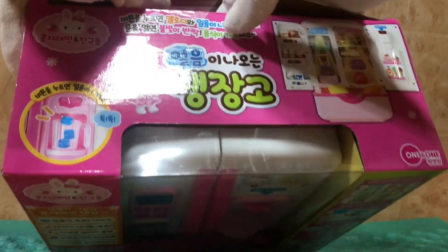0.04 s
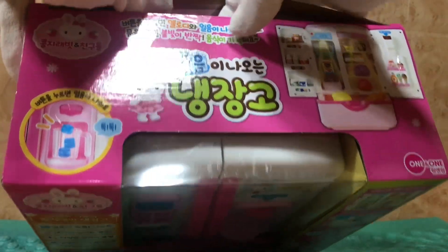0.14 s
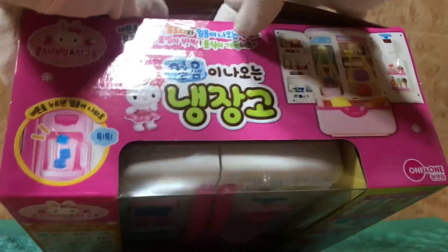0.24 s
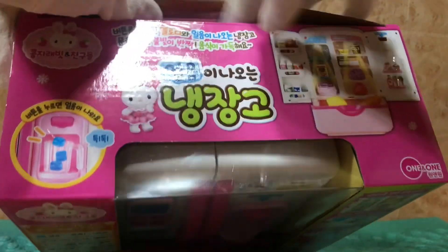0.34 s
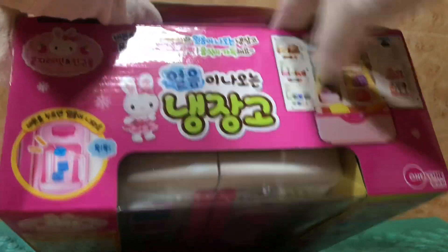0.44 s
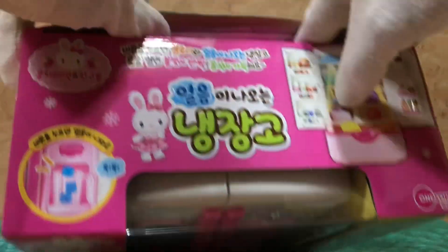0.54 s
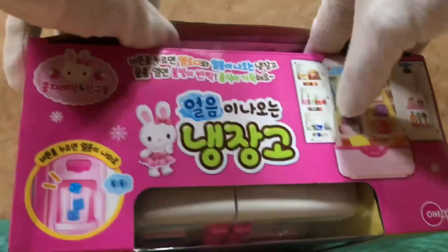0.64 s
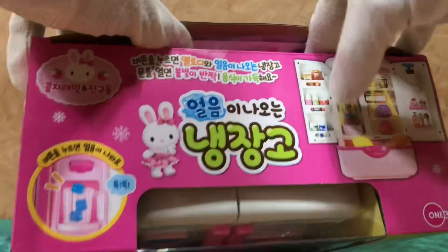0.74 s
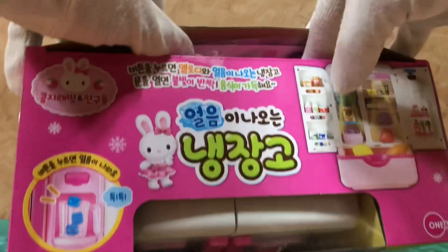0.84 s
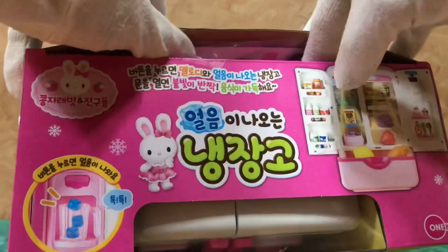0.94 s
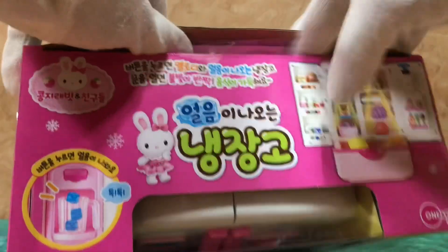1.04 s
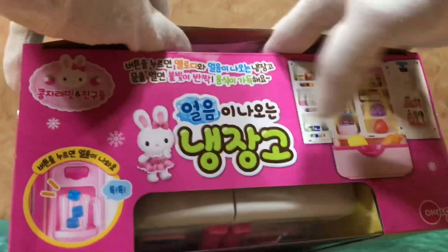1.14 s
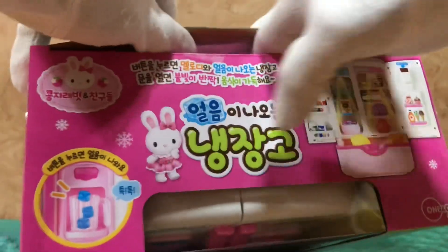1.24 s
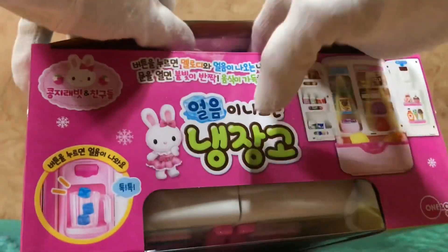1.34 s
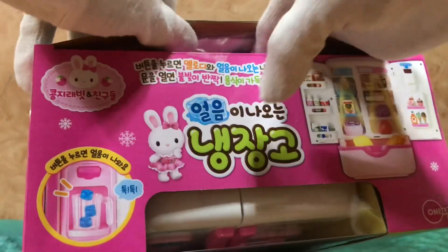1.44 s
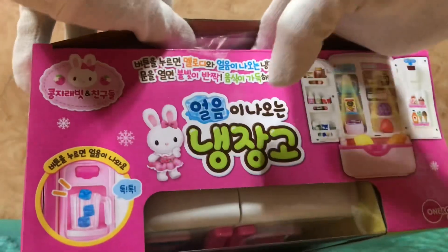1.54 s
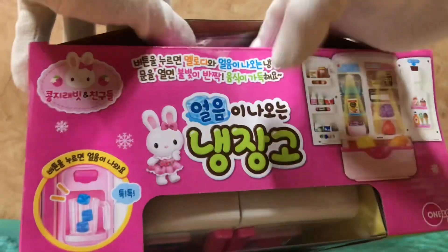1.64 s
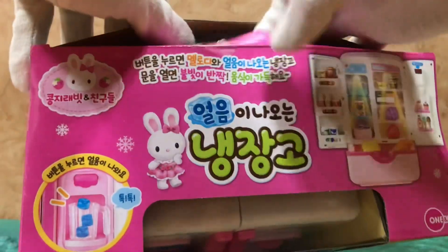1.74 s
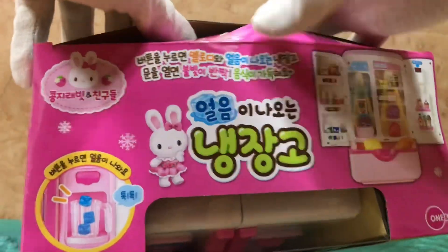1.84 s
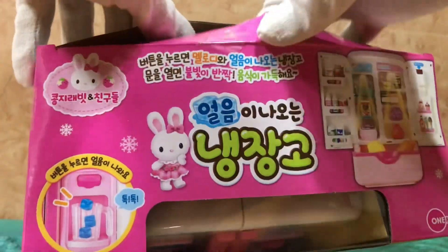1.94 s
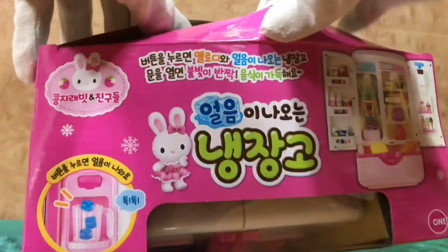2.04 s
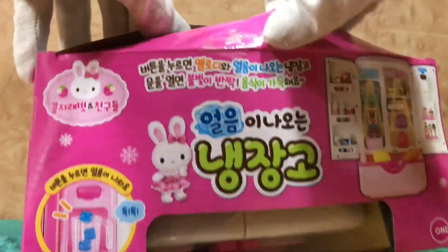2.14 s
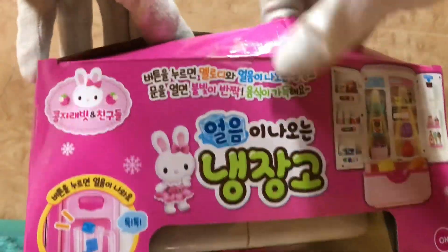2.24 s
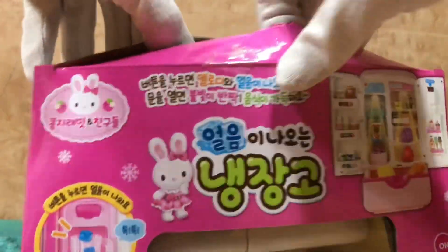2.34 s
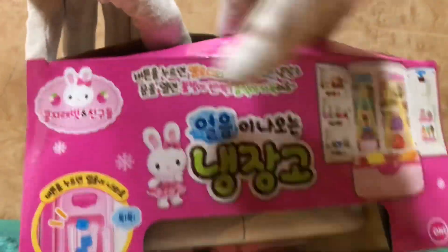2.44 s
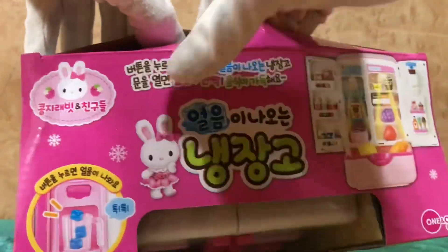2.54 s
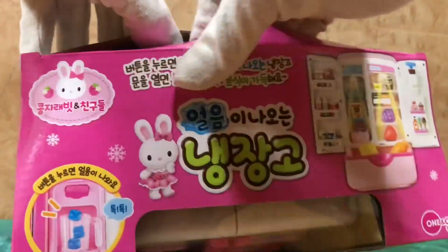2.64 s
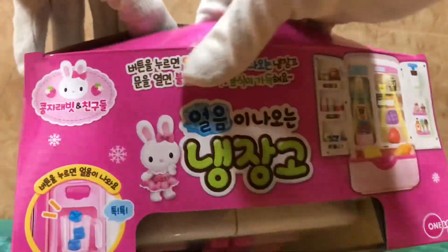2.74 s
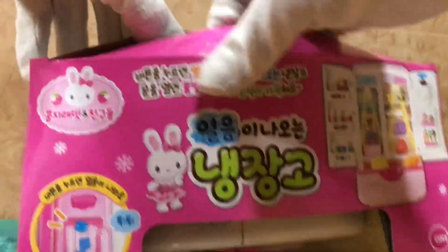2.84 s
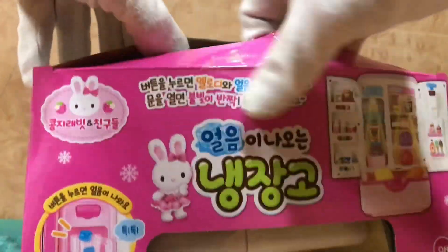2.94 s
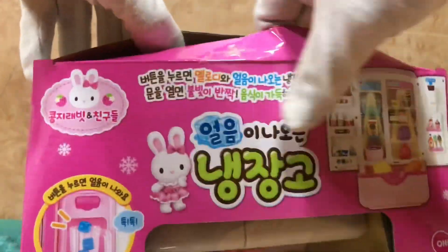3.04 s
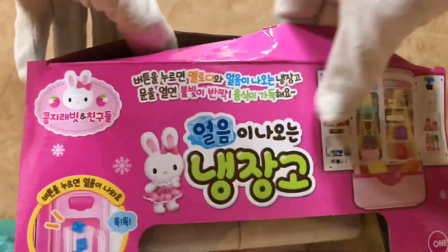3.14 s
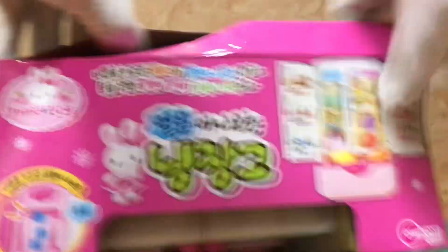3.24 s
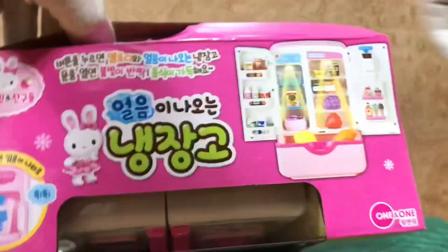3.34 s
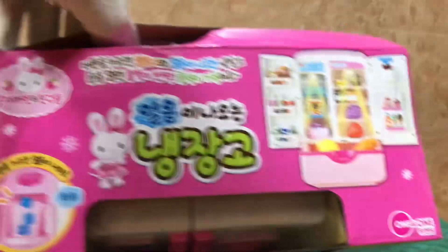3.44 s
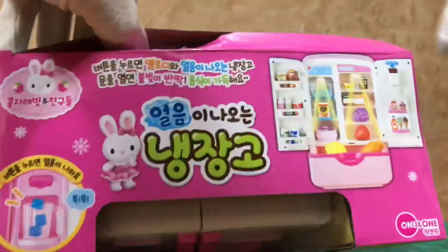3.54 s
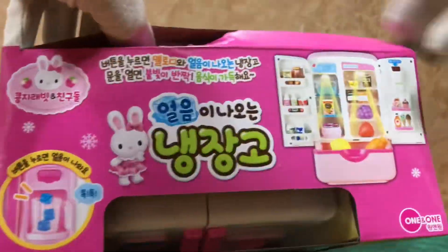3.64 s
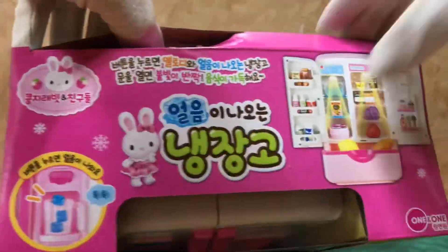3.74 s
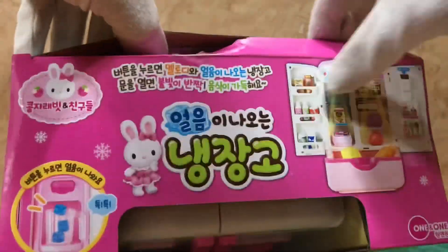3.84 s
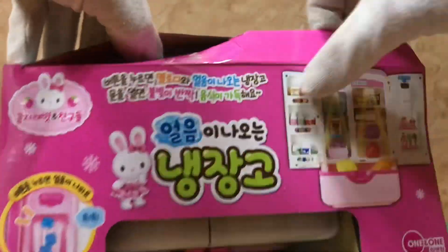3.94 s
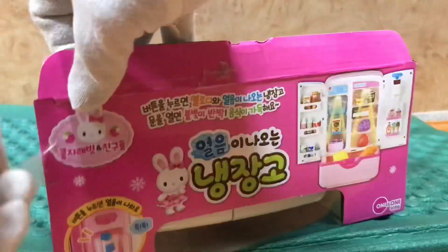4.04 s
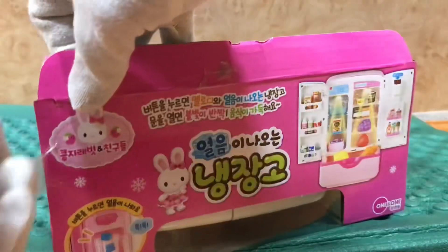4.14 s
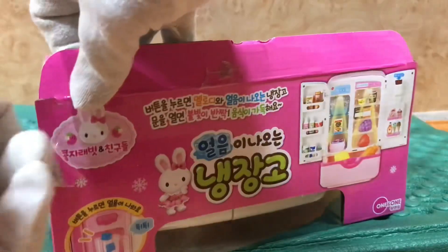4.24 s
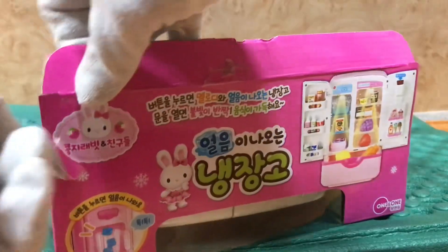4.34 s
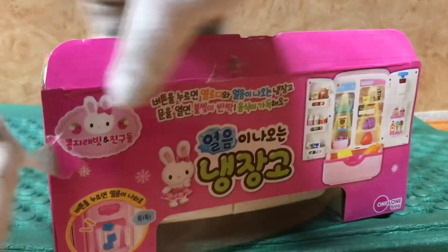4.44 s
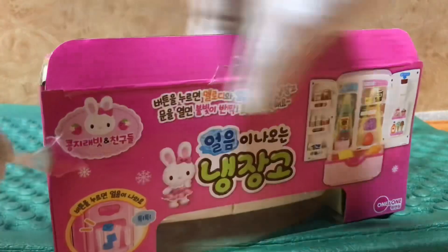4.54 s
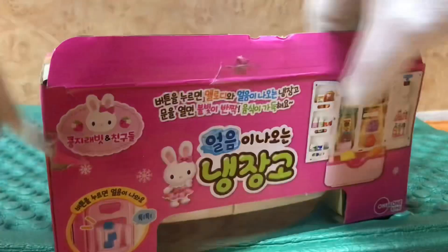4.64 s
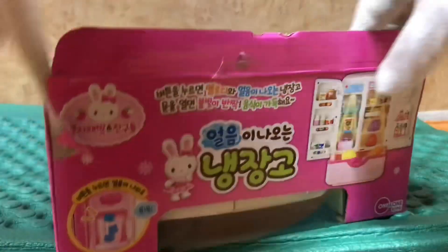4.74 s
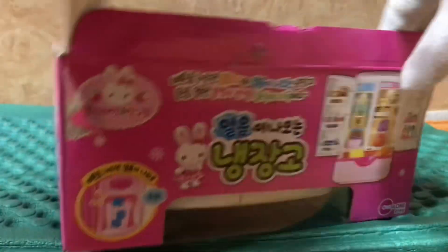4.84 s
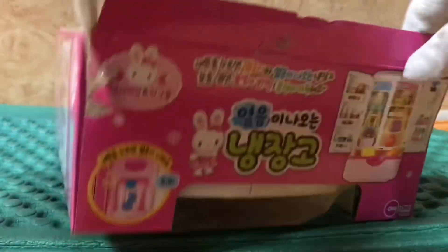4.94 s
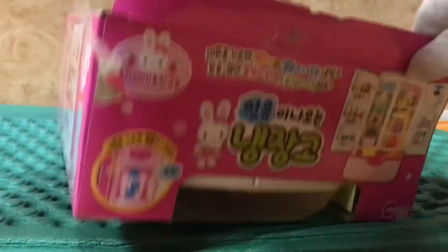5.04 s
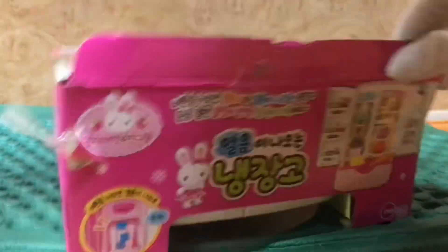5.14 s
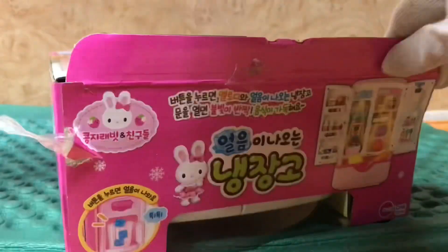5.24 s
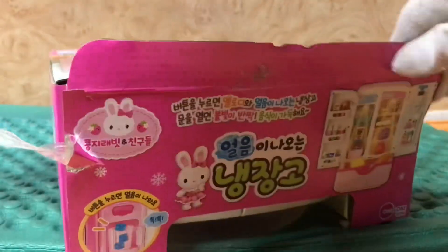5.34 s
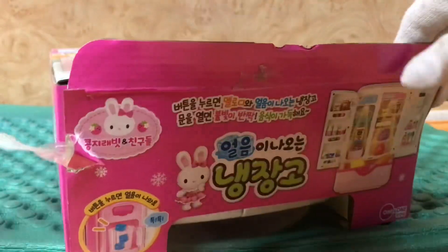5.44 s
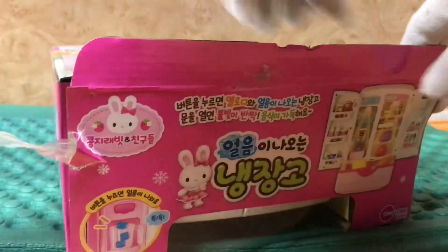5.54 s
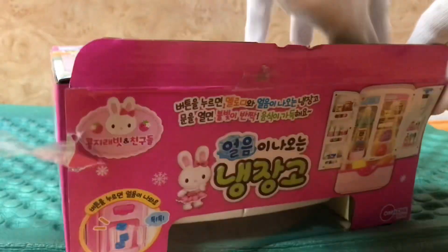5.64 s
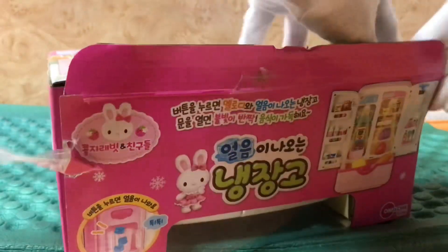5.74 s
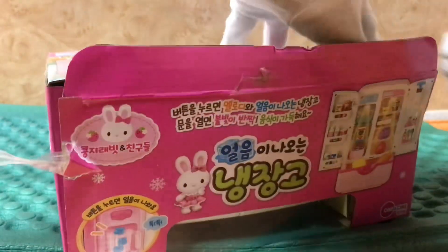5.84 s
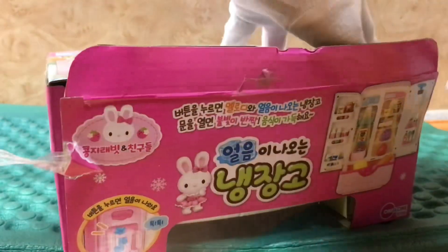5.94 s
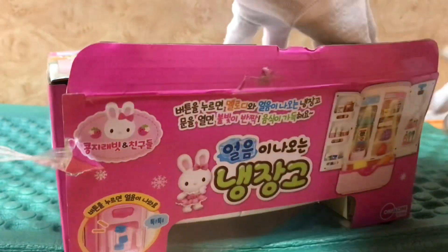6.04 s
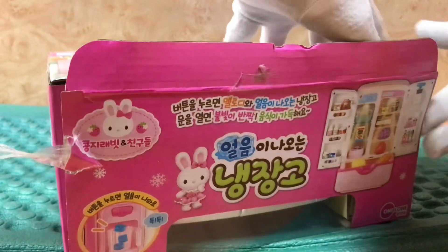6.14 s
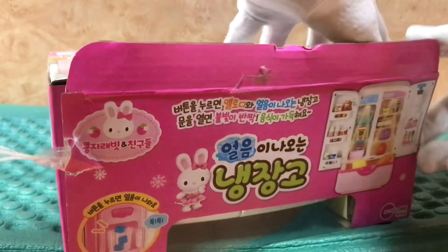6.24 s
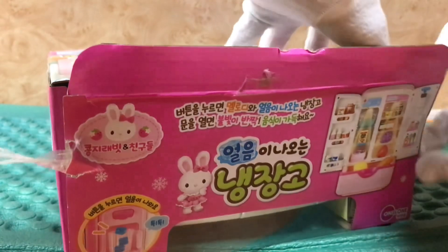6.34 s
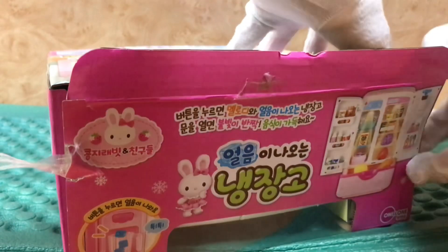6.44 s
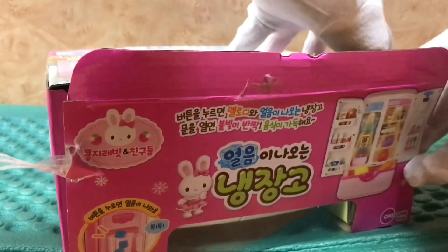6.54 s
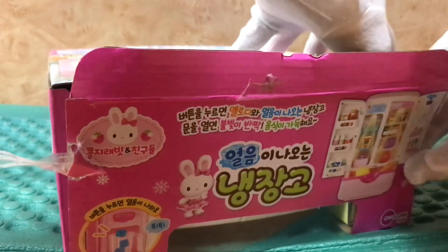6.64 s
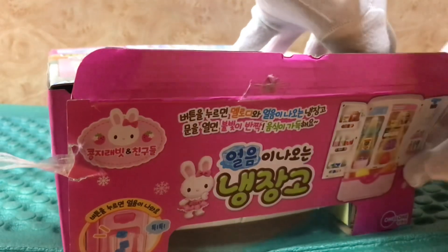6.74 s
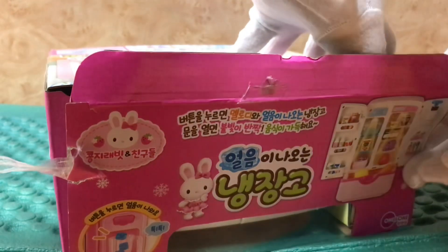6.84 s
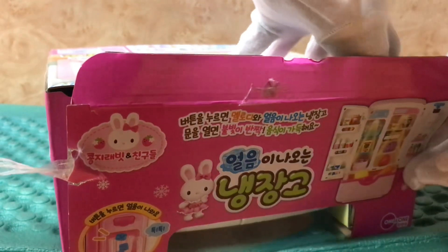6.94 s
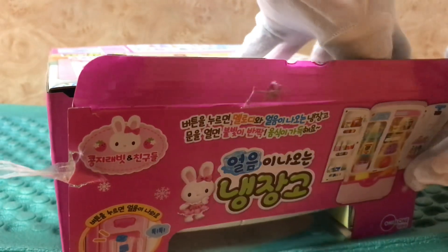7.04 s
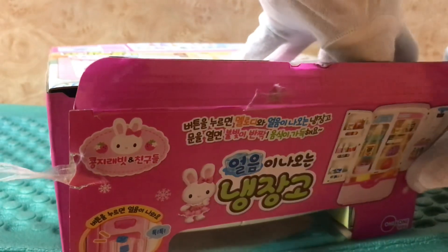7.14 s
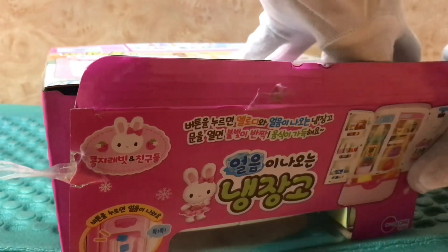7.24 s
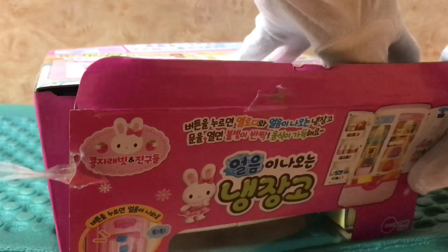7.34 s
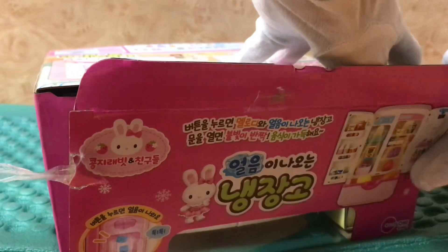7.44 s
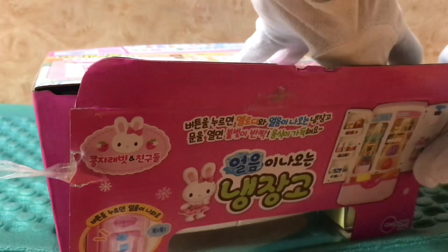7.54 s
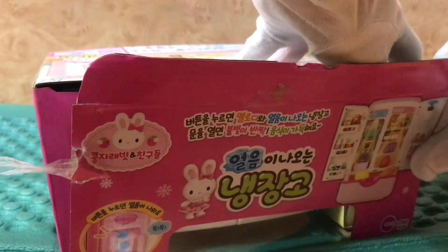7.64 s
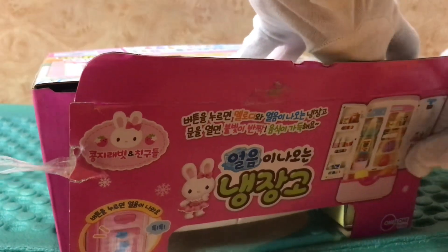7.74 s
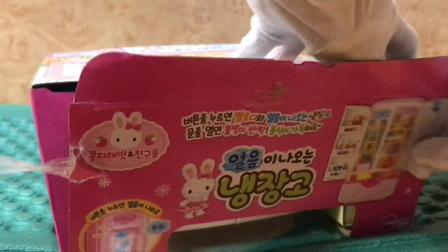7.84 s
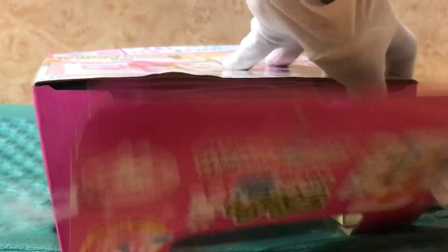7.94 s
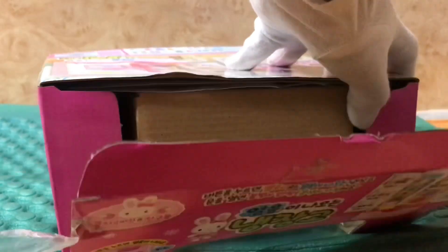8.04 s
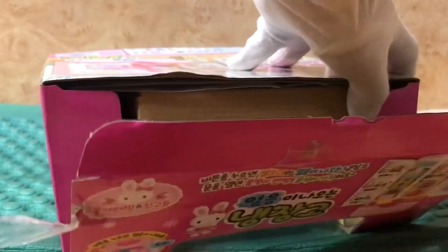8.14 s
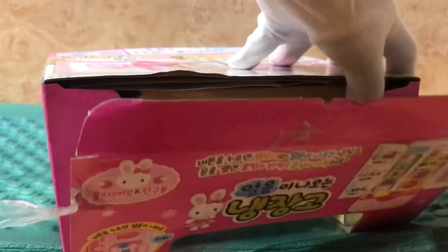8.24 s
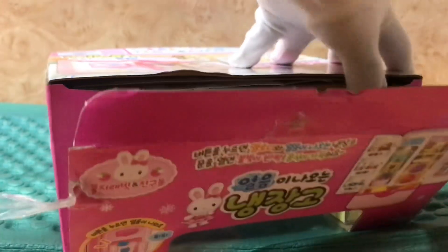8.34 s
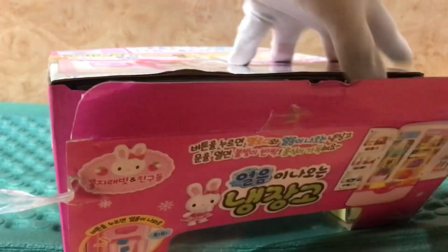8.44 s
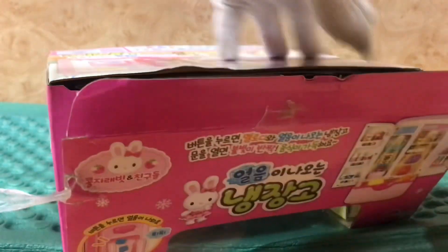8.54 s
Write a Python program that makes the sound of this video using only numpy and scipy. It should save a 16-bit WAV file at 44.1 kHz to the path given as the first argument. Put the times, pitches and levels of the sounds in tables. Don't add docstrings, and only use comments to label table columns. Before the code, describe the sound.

Soft cloth-on-card rubbing with irregular small fold pops, gradually more forceful. Mid-pitched cardboard cracks with low boxy thumps peak around three seconds, followed by a high splintering film crackle about a second later. Sparse ticks, soft peels and dull bumps fill the quieter second half until bright snapping bursts near the end. Very close and dry, short indoor tail, faint hiss.

```python
import sys
import numpy as np
from scipy import signal
from scipy.fft import rfft, irfft, next_fast_len
from scipy.io import wavfile
from scipy.ndimage import uniform_filter1d

SR = 44100
rng = np.random.default_rng(int(sys.argv[2]) if len(sys.argv) > 2 else 0)


def wav_record(signal):
    frames = np.transpose(np.atleast_2d(signal))
    bounded = np.clip(frames, -1, 1)
    quanta = np.round(bounded * 32767).astype(np.int16)
    wavfile.write(sys.argv[1], SR, quanta)


def elevation(decibels):
    levels = np.asarray(decibels, float)
    return 10 ** (levels / 20)


N = 378819

# centre [Hz], width [Hz], level [dB]
PANEL_MODES = [(620, 370, 8.5), (1080, 714, 10), (1415, 438, 11), (1636, 125, 11.5), (1900, 570, 2.5)]
# centre [Hz], width [Hz], level [dB]
GLOVE_MODES = [(2323, 960, 6.5), (3900, 1660, 4.5), (5800, 710, -0.5)]
# frequency [Hz], level [dB]
FILM_COLOUR = [(3000, -7.5), (4400, -6), (6000, -2.5), (8800, -6), (10500, -4), (12700, -5), (14700, -4),
               (17000, -18)]
# start [s], end [s], level [dB]
LEVEL_DIP = (4.057, 4.074, -21.5)


def evened(x):
    return x / np.sqrt(np.mean(x ** 2) + 1e-20)


def read(points, hz):
    f, value = np.transpose(points)
    return np.interp(np.log(hz + 1), np.log(f + 1), value)


def add(mix, start_s, sound):
    part = mix[round(start_s * SR):][:len(sound)]
    part += sound[:len(part)]


def coloured(x, points):
    size = next_fast_len(len(x), True)
    hz = np.fft.rfftfreq(size, 1 / SR)
    inside = (hz > points[0][0]) & (hz < points[-1][0])
    return irfft(rfft(x, size) * elevation(read(points, hz)) * inside, size)[:len(x)]


def resonate(x, hz, width_hz):
    b, a = signal.iirpeak(np.clip(hz, 30, SR / 3), max(hz / width_hz, 0.3), SR)
    return signal.lfilter(b, a, x)


def body(x, modes):
    out = 0
    for k, (hz, width_hz, level_db) in enumerate(modes):
        out = out + (-1) ** k * elevation(level_db) * resonate(x, hz, width_hz)
    return out


def slips(per_s, spread_db, smooth):
    size = elevation(spread_db * np.minimum(rng.exponential(1, N), 5))
    ticks = size * rng.standard_normal(N) * (rng.random(N) < per_s / SR)
    return evened(ticks) + smooth * rng.standard_normal(N)


def flipped(x):
    return x * rng.choice([-1., 1.], len(x))


def wander(seconds):
    span = max(round(seconds * SR), 2)
    return evened(uniform_filter1d(uniform_filter1d(rng.standard_normal(N), span), span))


def crease(x, hz, sharp, jolt):
    high = np.clip((hz - 900) / 2500, 0, 1)
    ring = resonate(resonate(x, hz, hz / sharp), hz, 0.35 * hz)
    panel = (0.81 * (1 - high) + jolt * high) * evened(body(x, PANEL_MODES))
    edge = (0.18 + 0.5 * high) * evened(body(x, GLOVE_MODES))
    return evened(evened(ring) + panel + edge)


def rubbing():
    # middle_s [s], reach_s [s], pressure_db [dB], lean_db from card to film [dB]
    rubs = [(0.0, 0.49, -69, -7), (.4, 0.21, -58.5, 3), (.75, 0.1, -58.5, -1), (1.21, 0.18, -60.5, 4.5),
            (1.491, 0.08, -50.5, -8.5), (1.7, 0.31, -56.5, -5), (1.96, 0.26, -69, -11),
            (2.26, 0.058, -57, 7), (2.48, 0.31, -53, -4), (2.86, 0.018, -57.5, -13),
            (3.011, 0.18, -48.5, 2), (3.77, 0.14, -61, -2.5), (4.041, 0.19, -49.5, -1),
            (4.12, 0.27, -47, 41), (4.601, 0.22, -49.5, 7), (4.97, 0.21, -56.5, 6), (5.27, 1, -62, 3.5),
            (5.729, 0.15, -55.5, 5.5), (6.18, 0.14, -71, -1), (6.479, 0.24, -54, 2.5),
            (6.75, 0.2, -60, 8.5), (7.05, 0.26, -74, 5), (7.42, 0.56, -63, 3), (7.69, 0.18, -58, 3.5),
            (7.881, 0.13, -41.5, 17), (8.438, 0.21, -54, 1)]
    resting_db = (-70.5, -90.5, -77)
    t = np.arange(0, N + 64, 64) / SR
    middle_s, reach_s, pressure_db, lean_db = np.transpose(rubs)[:, :, None]
    swell_db = pressure_db - 14 * abs(t - middle_s) / np.maximum(reach_s, 0.02)
    swell_db -= 60 * ((middle_s < LEVEL_DIP[0]) != (t < LEVEL_DIP[0]))
    card_db = -0.5 - lean_db
    glove_db = -1.64
    film_db = -3.5 + np.minimum(lean_db, 9.5 - 0.55 * lean_db)
    gains = []
    for surface_db, rest_db in zip((card_db, glove_db, film_db), resting_db):
        power = (elevation(swell_db + surface_db) ** 2).sum(0) + elevation(rest_db) ** 2
        gains.append(np.interp(np.arange(N) / SR, t, np.sqrt(power)))
    return gains


def handling(drags):
    # frequency [Hz], level [dB per Hz]
    boom_colour = [(15, -31.5), (25, -10), (49, 7), (83, 1.5), (237, 1), (325, -7), (600, -19), (900, -63)]
    # time_s [s], load_db [dB]
    hand_load = [(0, -67), (.3, -54.5), (.62, -60.5), (1.4, -61.5), (2.3, -55.5), (2.65, -51.5),
                 (2.9, -64.5), (3.6, -63), (4.27, -74), (4.4, -65), (4.88, -52), (5.3, -55.5), (5.45, -63),
                 (6.6, -56.5), (6.999, -58), (8.15, -59.5), (8.28, -50), (8.59, -56.5)]
    card, cloth, sheet = rubbing()
    load = elevation(np.interp(np.arange(N) / SR, *np.transpose(hand_load)) - 1.5)
    load = load + 0.38 * cloth
    load = load + 0.38 * uniform_filter1d(abs(drags), round(0.03 * SR))
    grip = wander(0.019)
    fibres = slips(45, 3.0, smooth=0.01)
    contact = slips(1600, 2.5, smooth=3.2) + 0.18 * fibres
    boom = evened(coloured(rng.standard_normal(N), boom_colour)) * load * elevation(2.4 * wander(0.03))
    panel = evened(body(contact, PANEL_MODES)) * card * elevation(2.3 * grip)
    glove = evened(body(flipped(contact), GLOVE_MODES)) * cloth * elevation(1.85 * grip)
    film = evened(coloured(flipped(contact), FILM_COLOUR)) * sheet * elevation(grip + 1.1 * wander(0.03))
    return boom, panel + glove + film


def flexing(x, depth_db):
    z = signal.stft(x, nperseg=512, noverlap=384)[2]
    patches = uniform_filter1d(rng.standard_normal(z.shape), size=3, axis=0)
    patches = uniform_filter1d(patches, size=14, axis=1)
    return signal.istft(z * elevation(depth_db * evened(patches)), nperseg=512, noverlap=384)[1][:N]


def releases():
    # start_s [s], crease_db peak [dB], film_db peak [dB], ring_hz [Hz], t60_s [s]
    cracks = [(0.77, -32.5, -42, 1690, 0.01), (1.248, -30.5, -38, 1600, 0.024),
              (1.6275, -15.5, -28, 1650, 0.046), (3.181, -6.5, -22.5, 1530, 0.027),
              (3.2935, -7.5, -28, 1144, 0.025), (4.1545, -16.5, -28, 2900, 0.022),
              (4.161, -15, -21, 1730, 0.034), (4.1745, -22, -33, 5000, .02), (4.177, -24, -18, 4000, 0.019),
              (4.181, -25, -18, 5800, .01), (4.1832, -14.5, -14, 5800, 0.014),
              (4.188, -16, -14, 5900, 0.015), (4.193, -19, -21, 3730, 0.012),
              (4.2158, -13, -10, 4500, 0.014), (4.2306, -15, -10.5, 3720, 0.013),
              (5.005, -20, -23.5, 5800, 0.032), (6.362, -27, -19.5, 6540, 0.022),
              (6.363, -29, -43, 1330, 0.035), (7.291, -43, -36, 4160, 0.046),
              (7.2945, -37.5, -31.5, 4460, 0.05), (7.667, -18.5, -25.5, 2300, 0.021),
              (7.758, -14, -12.5, 6300, 0.031), (7.759, -18, -27, 2460, 0.032),
              (7.775, -19, -12, 3400, 0.027), (7.795, -20.5, -26.5, 3292, 0.031),
              (7.813, -23, -26, 3300, 0.03), (7.8348, -20, -14.5, 3900, 0.022),
              (7.9195, -19, -25, 2520, 0.025), (8.3545, -18.5, -35, 2780, 0.028)]
    # start_s [s], crease_db peak [dB], film_db peak [dB], ring_hz [Hz]
    pops = [(.01, -38.5, -50, 1570), (.081, -51, -50, 1680), (0.44, -42.5, -49, 1640),
            (.928, -43, -48.5, 1630), (1.319, -39, -41.5, 1700), (1.426, -33, -43.5, 1510),
            (1.5587, -35, -54, 1690), (1.749, -35, -37.5, 1210), (1.612, -37, -53, 1440),
            (2.211, -45, -53, 1060), (2.214, -31.5, -49, 1400), (2.263, -49, -40, 1080),
            (5.1475, -39, -56, 690), (2.403, -30, -32, 1270), (2.493, -33.5, -38, 620),
            (2.505, -30, -40, 1620), (2.582, -37, -38.5, 1650), (2.67, -32, -44, 1590),
            (2.726, -44, -41, 1030), (2.783, -33.5, -39.5, 1170), (3.699, -44, -42, 1010),
            (4.381, -34.5, -37.5, 3600), (4.664, -33, -43, 3360), (5.801, -35, -40, 3530),
            (5.949, -43, -47, 2420), (6.169, -41, -41.5, 1607), (2.397, -31.5, -44, 1040),
            (0.769, -32, -61, 3580), (1.249, -30, -53, 3630), (1.475, -26, -44, 4370),
            (1.509, -37, -48, 1510), (8.232, -45.5, -66, 433), (2.428, -27.5, -49, 1020),
            (2.438, -32, -49, 1120), (2.84, -36.5, -51.5, 1090), (8.052, -52, -61, 1500),
            (7.714, -33, -52, 6000), (7.719, -43, -50, 6200), (7.728, -42, -46, 6800),
            (7.736, -45, -50, 6600), (2.2421, -30, -42, 1230), (2.245, -28, -30.5, 1070),
            (2.465, -34, -58, 965), (2.697, -41, -46, 1100), (3.187, -23, -42, 1600),
            (1.629, -21.5, -40, 766), (7.782, -15, -20, 3360), (8.382, -29.5, -53, 860)]
    # start_s [s], film_db peak [dB]
    ticks = [(.057, -48.5), (0.456, -44.5), (0.713, -51), (1.067, -40), (3.252, -23), (3.962, -34.5),
             (4.199, -39), (4.659, -31.5), (4.696, -36.5), (4.9, -40), (4.91, -38.5), (4.9585, -42),
             (4.993, -40), (5.001, -30), (5.103, -42), (5.109, -42), (5.285, -47), (4.93, -32),
             (5.224, -41.5), (5.264, -35.5), (5.601, -39), (6.909, -50), (7.21, -44.5), (7.404, -42),
             (8.057, -28), (8.096, -39), (8.271, -44.5), (3.2835, -29), (8.445, -45), (8.487, -59)]
    pop_t60_s, tick_hz, tick_t60_s = 0.022, 3500, 0.011
    pop_rows = [(*row, pop_t60_s) for row in pops]
    tick_rows = [(start_s, film_db - 12.5, film_db, tick_hz, tick_t60_s) for start_s, film_db in ticks]
    return cracks + pop_rows + tick_rows


def snaps():
    out, blows, t = np.zeros(N), np.zeros(N), np.arange(2048) / SR
    tick = signal.unit_impulse(len(t), 64)
    for start_s, crease_db, film_db, hz, t60_s in releases():
        splinters, crackle = rng.standard_normal((2, len(t)))
        decay_s = max(t60_s, 0.002)
        fade = elevation(-60 * t / decay_s) * np.minimum(t / 0.00082, 1) ** 2
        blow = signal.unit_impulse(len(t), 40) + splinters * fade / np.linalg.norm(fade)
        soft = signal.lfilter(*signal.butter(2, min(2.7 * hz, SR / 3), fs=SR), blow)
        ring = crease(soft, hz, sharp=5.4, jolt=0.66)
        ring = elevation(crease_db + 2.0) * ring / abs(ring).max()
        spray = coloured(crackle, FILM_COLOUR) * elevation(-110 * t / decay_s) * np.minimum(t / 0.00054, 1) ** 2
        spray = elevation(film_db + 6.0) * spray / abs(spray).max()
        add(out, start_s, ring + spray)
        bare_ring = ring.std() * crease(tick, hz, sharp=2.8, jolt=0.56)
        bare_spray = spray.std() * evened(coloured(tick, FILM_COLOUR))
        add(blows, start_s, bare_ring + bare_spray)
    return out, blows


def scrapes():
    # start_s [s], length_s [s], crease_db [dB], film_db [dB], ring_hz [Hz]
    lid_drags = [(0.216, 0.22, -62.5, -65, 1070), (0.805, 0.08, -54.5, -67, 1600),
                 (1.008, 0.11, -57, -62, 1060), (1.272, 0.13, -55.5, -82, 1700),
                 (1.412, 0.057, -50.5, -67, 680), (1.457, 0.043, -43.5, -46.5, 1750),
                 (1.483, 0.077, -46, -56, 1590), (1.604, 0.058, -41, -60, 1470),
                 (1.723, 0.075, -50.5, -56, 2700), (1.852, 0.36, -55, -63.5, 910),
                 (2.205, 0.066, -41.5, -51, 1000), (2.24, 0.015, -35.5, -48, 1210),
                 (2.31, 0.025, -45.5, -57.5, 1000), (2.382, 0.077, -39, -47.5, 1110),
                 (2.475, 0.04, -43, -57, 1080), (2.653, 0.1, -44, -54, 1080),
                 (2.838, 0.17, -44.5, -48, 1080), (3.022, 0.21, -45, -55, 1670),
                 (3.15, 0.2, -40, -45.5, 1650), (3.653, 0.18, -50.5, -56.5, 1056),
                 (3.896, 0.12, -53.5, -80, 1600)]
    # start_s [s], length_s [s], crease_db [dB], film_db [dB], ring_hz [Hz]
    peels = [(3.988, 0.14, -57, -51, 2970), (4.513, 0.12, -50, -49.5, 2740),
             (4.968, 0.032, -57.5, -43.5, 1760), (5.07, 0.051, -50, -52, 2280),
             (5.25, 0.13, -58.5, -57, 2130), (5.736, 0.12, -54, -54.5, 3900),
             (6.064, 0.11, -59.5, -60.5, 4440), (6.298, 0.057, -59.5, -55, 2720),
             (6.403, 0.17, -55, -52, 3900), (6.664, 0.14, -56, -59, 4260), (7.56, 0.64, -53.5, -66, 5800.0),
             (7.762, 0.082, -33, -41, 5560), (7.789, 0.19, -48, -41.5, 4570),
             (8.35, 0.091, -47.5, -61, 2480)]
    out = np.zeros(N)
    contact, grip = slips(3000, 2.8, smooth=1.0), elevation(2 * wander(0.004))
    film_contact = flipped(contact)
    for start_s, length_s, crease_db, film_db, hz in lid_drags + peels:
        span = slice(round(start_s * SR), round((start_s + max(length_s, 0.01)) * SR))
        u = np.linspace(0, 1, len(contact[span]))
        stroke = evened(np.minimum(u / 0.28, 1) * np.minimum((1 - u) / 0.57, 1) * grip[span])
        card = elevation(crease_db) * crease(contact[span], hz, sharp=3.46, jolt=0.65)
        film = elevation(film_db) * evened(coloured(film_contact[span], FILM_COLOUR))
        add(out, start_s, stroke * (card + film))
    return out


def thumps():
    # start_s [s], level_db peak [dB], pitch_hz [Hz], swing_s [s]
    flexes = [(0.488, -41, 72.5, 0.0038), (1.43, -32, 262, 0.0027), (1.4735, -38, 294, 0.0083),
              (1.634, -15, 121, 0.0097), (2.247, -34, 210, 0.014), (2.3144, -35, 222, 0.0093),
              (2.4146, -36, 155, 0.04), (2.495, -31.5, 142, 0.013), (2.6033, -29.5, 135, 0.0075),
              (2.255, -35, 110, 0.0086), (2.691, -29, 215, 0.01), (2.896, -39.5, 190, .016),
              (3.112, -40.5, 197, 0.025), (3.1887, -15, 102, 0.0071), (3.298, -13, 99.5, 0.0055),
              (3.961, -39.5, 133, 0.0078), (5.015, -35.5, 50, 0.014), (5.017, -29, 127, 0.014),
              (5.06, -33, 70, 0.01), (5.173, -42, 54.5, 0.033), (5.306, -43, 70.4, 0.021),
              (5.379, -54, 57.8, .015), (5.608, -36.5, 55.2, .02), (5.62, -35.5, 149, 0.016),
              (7.837, -21.5, 103.8, 0.01), (5.031, -32, 189, 0.0078), (5.6024, -23.5, 119, 0.007),
              (5.596, -32, 261, 0.01), (5.006, -32, 239, 0.015), (6.536, -37.5, 151, 0.0084),
              (6.743, -42, 118, 0.019), (5.787, -40.5, 304, 0.003), (6.066, -48, 81.5, 0.013),
              (6.752, -43, 169, 0.0082), (7.176, -43, 203, 0.008), (7.306, -44, 86, 0.014),
              (7.776, -29.5, 239, 0.019), (8.058, -41.5, 76.6, 0.0044), (8.341, -41, 90, 0.0079)]
    # start_s [s], level_db peak [dB], pitch_hz [Hz]
    knocks = [(.828, -43, 177), (1.251, -40.5, 111), (4.163, -22, 252), (4.215, -21.5, 322),
              (4.196, -31, 130.2), (4.232, -24, 148.4), (4.38, -42.5, 293), (4.547, -39.5, 103),
              (5.009, -28, 285), (5.148, -28, 151), (5.948, -51, 245), (6.365, -34.5, 201),
              (6.545, -44.5, 230), (7.6684, -27.5, 231.5), (7.7604, -22, 208), (7.836, -27, 182),
              (7.923, -28.5, 194)]
    knock_swing_s = 0.0042
    out, t = np.zeros(N), np.arange(8192) / SR
    dull = signal.butter(3, 430, fs=SR)
    for start_s, level_db, hz, swing_s in flexes + [(*row, knock_swing_s) for row in knocks]:
        noise = rng.standard_normal(len(t))
        swing = np.exp(-(t / max(swing_s, 0.003)) ** 2 / 2) + 0.29 * elevation(-60 * t / 0.14)
        knock = evened(signal.lfilter(*dull, resonate(noise, 260, 420))) * elevation(-60 * t / 0.045)
        wobble = evened(resonate(noise, 1.81 * hz, 79)) * elevation(-60 * t / 0.16)
        walls = np.sin(2 * np.pi * hz * t) * swing
        walls = walls + 0.6 * min(0.005 / swing_s, 1) * knock + 0.25 * wobble
        add(out, start_s, elevation(level_db) * walls * np.minimum(t / 0.0022, 1))
    return out


def singing():
    # start_s [s], length_s [s], level_db [dB], pitch_hz [Hz], width_hz [Hz]
    sung_notes = [(.78, .1, -69, 1600, 120), (1.452, 0.037, -44, 1600, 200),
                  (1.49, 0.049, -45.5, 1560, 300), (1.467, 0.015, -41.5, 4280, 900),
                  (1.485, 0.06, -48.5, 3950, 1200), (2.235, 0.0079, -30.5, 1290, 302),
                  (3.184, 0.033, -35, 1010, 200), (3.3, 0.087, -41, 1100, 190),
                  (3.317, 0.28, -58, 2210, 160), (3.92, 0.021, -51, 1580, 100),
                  (3.968, 0.05, -63, 1630, 100), (4.026, 0.049, -58, 1100, 120),
                  (4.178, 0.024, -33.5, 840, 120), (5.089, 0.023, -57, 2330, 120),
                  (5.118, .035, -57, 2460, 149), (5.268, 0.12, -60.5, 940, 298),
                  (6.418, 0.092, -55, 4240, 200), (6.45, 0.089, -58, 1340, 150),
                  (7.59, 0.083, -60, 6400, 700), (7.696, .055, -53, 6400, 900)]
    out, noise = np.zeros(N), rng.standard_normal(N)
    for start_s, length_s, level_db, hz, width_hz in sung_notes:
        part = noise[round(start_s * SR):round((start_s + max(length_s, 0.01)) * SR)]
        u = np.linspace(0, 1, len(part))
        shape = np.minimum(u / 0.44, 1) * np.minimum((1 - u) / 0.74, 1)
        tone = resonate(resonate(part, hz, width_hz), hz, 2 * width_hz)
        add(out, start_s, elevation(level_db) * evened(shape * tone))
    return out


def taps():
    # start_s [s], level_db peak [dB], pitch_hz [Hz], ring length [cycles]
    hard_yields = [(1.7304, -35, 3000, 1.3), (1.7369, -31, 2800, 1.6), (1.7497, -31, 3500, 1.4),
                   (1.7632, -34, 3200, 1.2), (1.7675, -31, 2800, 0.97), (1.7712, -37, 3000, 0.92),
                   (2.4925, -32, 885, 0.86), (3.1862, -14.5, 400, 0.78), (3.261, -27, 125, 2.2),
                   (3.2932, -8, 2310, 2.8), (4.1555, -31, 414, 1.4), (4.1645, -18, 804, 1.2),
                   (4.1835, -22, 4500, 1.4), (4.1887, -17, 4200, 1.5), (4.1934, -19, 3700, 1.4),
                   (4.976, -44, 1560, 5.5), (5.5965, -37.5, 1096, 1.1), (5.9505, -40.5, 760, 1.06),
                   (5.9525, -39.5, 296, 0.58), (6.5155, -27.5, 2510, 0.91), (6.5172, -32.5, 1010, 0.97),
                   (7.2957, -22.5, 4160, 4.8), (7.294, -38, 2280, 4.9), (7.7591, -8, 6100, 3),
                   (7.7595, -13.5, 2540, 3.9), (7.7756, -9, 3400, 3.5), (7.8353, -6.5, 4200, 1.5),
                   (7.8372, -20, 236, 0.9), (8.2986, -27, 1900, 0.42), (8.299, -33.5, 710, 0.85),
                   (8.3412, -29, 1500, .9), (8.342, -30.5, 504, 0.45), (8.351, -32, 1700, 1.8),
                   (8.352, -42, 496, 0.59), (8.3545, -17, 1725, 3.9), (0.9277, -53, 750, 2.9),
                   (1.489, -36, 3000, 1), (2.2652, -36.5, 2100, 1.4), (2.3047, -37, 1150, 2.2),
                   (3.2514, -24.5, 3000, 1.8), (4.2, -26.5, 298, 1.8), (4.2157, -22, 930, 0.66),
                   (4.231, -20, 703, 0.59), (6.3635, -35, 660, 3.1), (6.519, -38, 280, 1.1),
                   (6.5327, -30, 267, 1.5), (6.7453, -31.5, 240, 0.75), (7.778, -27, 953, 9.),
                   (7.9206, -23, 2370, 1.8), (6.3624, -13, 6600, 2.7)]
    out, t = np.zeros(N), np.arange(4096) / SR
    for start_s, level_db, hz, cycles in hard_yields:
        envelope = (1 - np.exp(-3.0 * hz * t)) * np.exp(-hz * t / max(cycles, 0.3))
        pull = -np.sin(2 * np.pi * hz * t) * envelope
        edge = np.diff(np.exp(-9.0 * hz * t), prepend=0)
        add(out, start_s, elevation(level_db) * (pull / abs(pull).max() - 0.3 * edge))
    return out + 0.18 * body(out, GLOVE_MODES)


def hollow():
    # centre [Hz], width [Hz], level [dB]
    air_modes = [(1130, 260, 0), (2100, 220, 0), (3100, 400, -7)]
    out, t = np.zeros(N), np.arange(SR // 2) / SR
    air = evened(body(rng.standard_normal(N + len(t)), air_modes))
    for start_s, crease_db, _, hz, _ in releases():
        if hz < 1250:
            fade = elevation(crease_db - 29.0 - 60 * t / 0.55) * np.minimum(t / 0.0066, 1)
            add(out, start_s, fade * air[round(start_s * SR):][:len(t)])
    return out


def room(x):
    # frequency [Hz], t60_s [s]
    decay = [(100, 0.34), (500, 0.08), (1100, 0.37), (1600, 0.45), (2100, 0.37), (3300, 0.62), (6000, 0.45),
             (14000, 0.2)]
    # frequency [Hz], level [dB]
    tail_colour = [(100, -0.5), (650, -3), (1100, 1), (1600, -10.5), (2100, -3.5), (2700, -4.5), (5000, -7),
                   (14000, -3)]
    at = np.arange(200, SR - 20, 20) + rng.integers(0, 20, (3, (SR - 201) // 20))
    echoes = np.zeros((3, SR))
    np.put_along_axis(echoes, at, rng.choice([-1., 1.], at.shape), 1)
    hz, t, z = signal.stft(echoes, SR, nperseg=256)
    fade_db = read(tail_colour, hz)[:, None] - 60 * t / read(decay, hz)[:, None]
    tails = signal.istft(z * elevation(fade_db), SR, nperseg=256)[1]
    phase = 7 * np.arange(N) / SR + np.arange(3)[:, None] / 3
    turn = np.cos(2 * np.pi * phase) * np.sqrt(2 / 3)
    return signal.fftconvolve(x * turn, tails / np.linalg.norm(tails[0]), axes=1)[:, :N].sum(0)


def scene():
    cracks, blows = snaps()
    drags = scrapes() + singing()
    knocks = thumps()
    boom, rub = handling(drags)
    rustle = flexing(drags + rub, depth_db=2.3)
    yields = taps()
    answer = elevation(-13.5) * room(blows + knocks + 0.8 * drags + 0.61 * yields)
    return (cracks + yields + knocks + boom + rustle + hollow() + answer)[None]


def top_cut(x):
    return signal.sosfilt(signal.butter(12, 17000, fs=SR, output="sos"), x)


def record(dry):
    # frequency [Hz], level [dB]
    port_colour = [(20, -30), (60, 2), (120, -0.5), (9500, -2), (10600, -7.5), (11800, -2.5), (16800, -3)]
    top_hz = 15850
    t = np.arange(N) / SR
    start_s, end_s, level_db = LEVEL_DIP
    gap = uniform_filter1d(1. * ((t > start_s) & (t < end_s)), size=60)
    hiss = elevation(-79.5) * evened(resonate(rng.standard_normal(N), 1500, 4600))
    x = coloured(dry[0] + hiss, port_colour) * elevation(level_db * gap)
    lowpass = signal.firwin(801, top_hz, window=("kaiser", 8), fs=SR)
    top = x - signal.oaconvolve(x, lowpass, "same")
    attack = uniform_filter1d(top ** 2, size=60) > 14 * uniform_filter1d(top ** 2, size=3000)
    opening = uniform_filter1d(uniform_filter1d(1. * attack, size=120), size=120)
    opening = np.minimum(opening * 2, 1)
    return top_cut((x - top * (1 - opening))[None])


dry = scene()
out = record(dry)
wav_record(out)
```